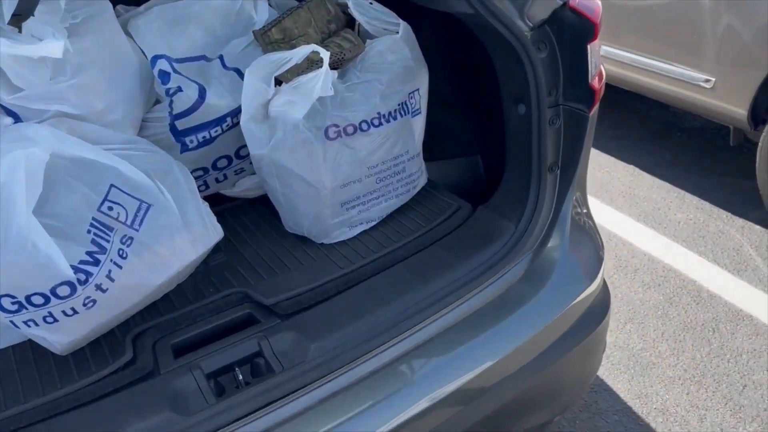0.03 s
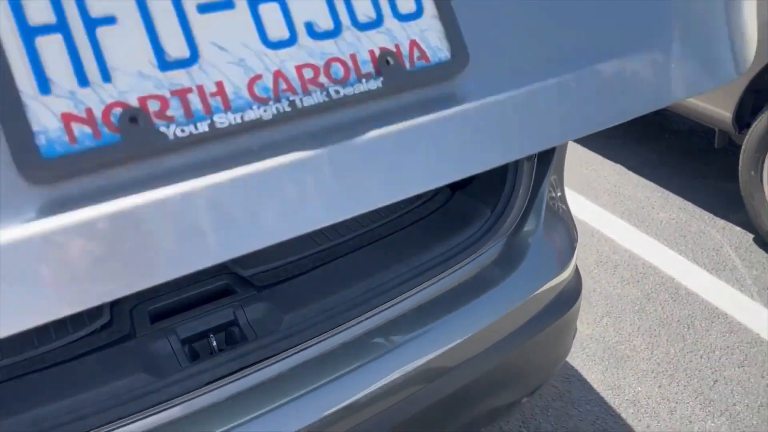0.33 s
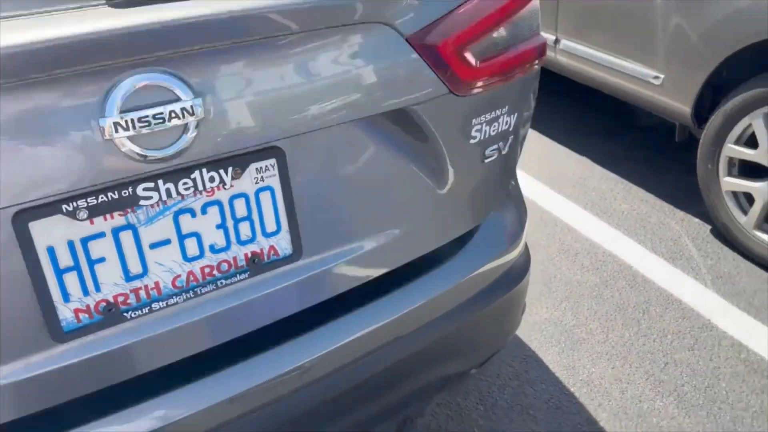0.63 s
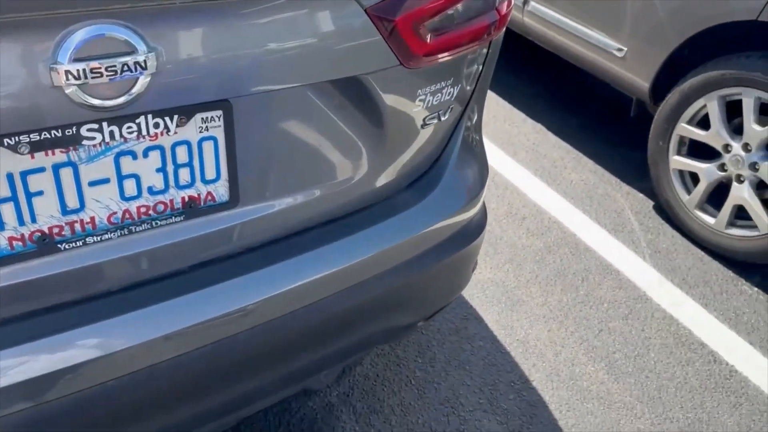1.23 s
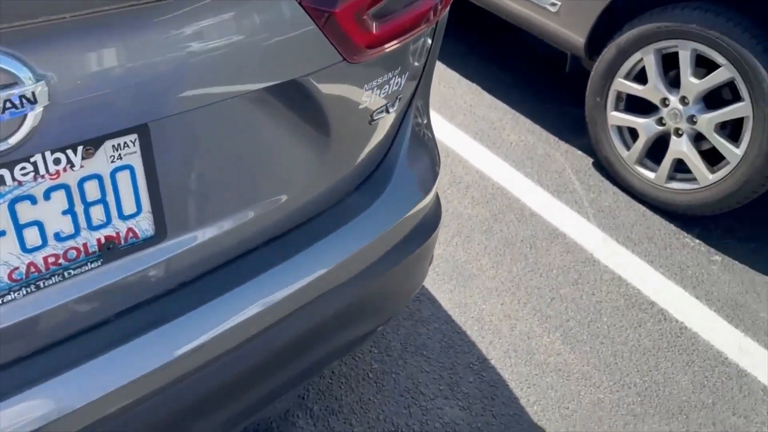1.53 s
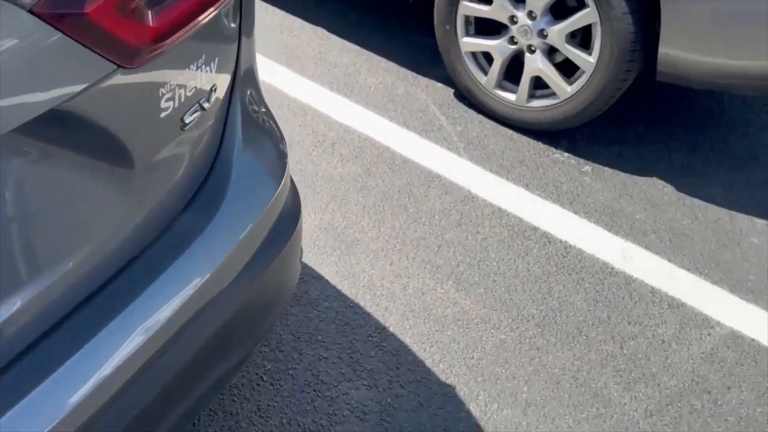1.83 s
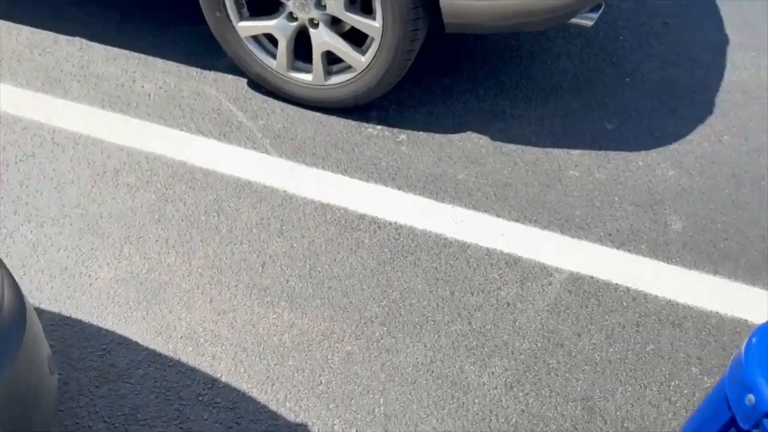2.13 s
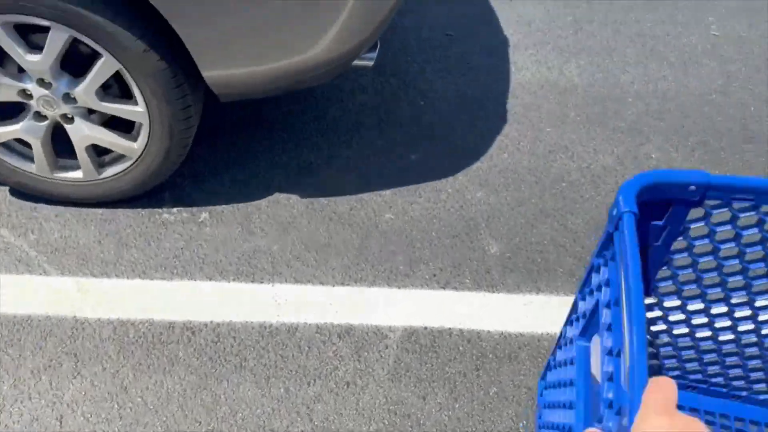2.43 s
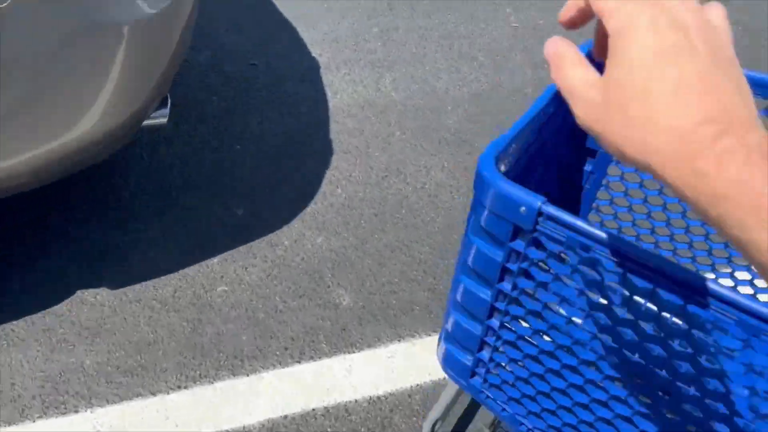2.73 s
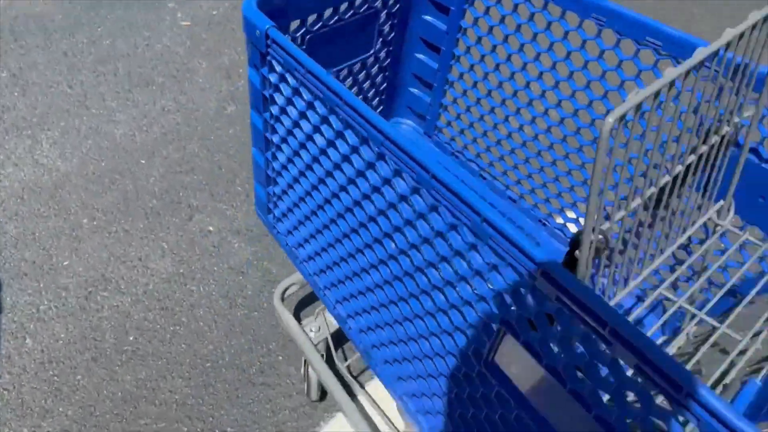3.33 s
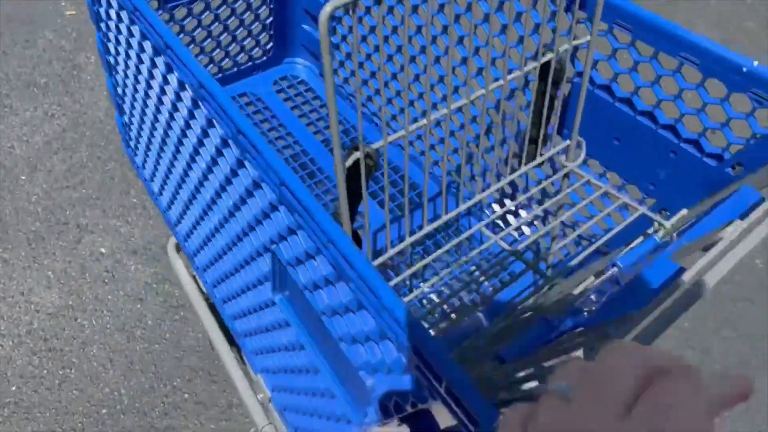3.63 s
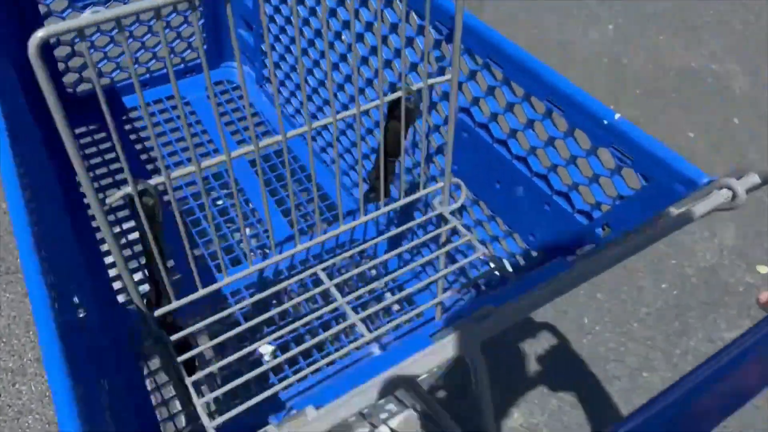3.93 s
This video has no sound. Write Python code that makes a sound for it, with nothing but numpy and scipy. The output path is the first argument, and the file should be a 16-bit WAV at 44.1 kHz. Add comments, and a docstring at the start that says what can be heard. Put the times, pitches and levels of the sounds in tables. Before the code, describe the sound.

A tailgate thumps shut close by, its loose plate clattering, before a shopping cart is pulled across gritty pavement, shaking its plastic basket and wire seat. An engine idles nearby and traffic rumbles far off outdoors.

```python
"""Tailgate and shopping cart in a parking lot

Open air, in stereo, with an engine idling nearby and traffic far off. A car's tailgate is slammed:
the latch catches, the cabin booms and a loose plate clacks against the door until it settles.
Then a plastic shopping cart is pulled over the asphalt: its wheels chatter on the stones
and shake the basket and wire seat."""
import sys
import numpy as np
from scipy import signal
from scipy.fft import rfft, irfft
from scipy.io import wavfile
from scipy.ndimage import uniform_filter1d

SR = 44100
rng = np.random.default_rng(int(sys.argv[2]) if len(sys.argv) > 2 else 0)


def dump(signal):
    """Clip the signal to [-1, 1] and save it as 16-bit WAV at the path in sys.argv[1]."""
    limited = np.clip(np.atleast_2d(signal).T, -1, 1)
    pcm = np.round(limited * 32767).astype(np.int16)
    wavfile.write(sys.argv[1], SR, pcm)


N = 176400

# spectra of the gate meeting its rubber seal, then the car's body: f/Hz, relative level/dB
SEAL_SPECTRUM = [(150, -20), (450, -24), (700, -1), (1200, -1), (4000, -17), (15000, -66)]
SLAM_SPECTRUM = [(25, 0), (60, 10), (140, -3), (240, 1.5), (400, -5.5), (800, -8.5), (1300, -18),
                 (2200, -25.5), (3500, -55), (7000, -34), (15000, -48)]
# modes of the door panel: f/Hz, level/dB, t60/s
PANEL_MODES = [(302, -23, 0.34), (321, -20.5, 1), (501, -27, 1), (1041, -34, 0.66)]
# thuds of the seal, striker, door and air trapped in the cabin: t/s, f/Hz, level/dB, t60/s
THUDS = [(0.7795, 666, -12, .05), (0.7888, 766, -10.5, 0.025), (0.792, 230, -2, 0.042),
         (0.8113, 59.3, -1.5, 0.14)]

def tailgate(seal_s=0.780, slam_s=0.789):
    """The gate touches its seal and is stopped by the body: the panel rings and the cabin booms."""
    click = signal.unit_impulse(SR)
    seal = from_db(-22.5) * burst(SEAL_SPECTRUM, t60=0.12, attack_s=0.0076, hold_s=0.01)
    panel = sum(from_db(db) * ring(click, hz, t60) for hz, db, t60 in PANEL_MODES)
    slam = from_db(-12.5) * burst(SLAM_SPECTRUM, t60=0.76)
    thuds = sum(placed(s, from_db(db) * ring(-click, hz, t60)) for s, hz, db, t60 in THUDS)
    return placed(seal_s, seal) + placed(slam_s, slam) + placed(slam_s, panel) + thuds


# clacks of the hinge, latch and loose plate: t/s, snap level/dB, body level/dB
CLACKS = [(0.495, -48, -32), (0.7872, -19, -16.5), (0.8314, -23, -19), (0.8598, -15, -11),
          (0.8918, -25.5, -22), (0.921, -13, -14), (0.9833, -15.5, -17.5), (1.0452, -22, -22.5),
          (1.109, -27, -23), (1.179, -35, -32.5), (1.2589, -46, -38), (1.678, -50, -50)]
# spectra of the snap, its tail and the plate's body: f/Hz, relative level/dB
SNAP_SPECTRUM = [(500, -8), (1800, -5.5), (2800, -3), (4500, 2), (7000, 2.5), (8800, 9.5), (10500, -1),
                 (15000, -15.5)]
TAIL_SPECTRUM = [(2500, 2), (5000, -0.5), (9000, -21), (15000, -21)]
PLATE_SPECTRUM = [(150, -17), (450, 1.5), (700, -3), (1080, 1.5), (1600, -15), (3000, -21), (8000, -37),
                  (15000, -65)]
# metallic modes of the plate: f/Hz, level/dB relative to the snap, t60/s
PLATE_MODES = [(4300, -12, 0.055), (4680, -18, 0.076), (5400, -17, 0.064), (5980, -7, 0.029),
               (7050, -30, .035)]

def clacks(attack_s=0.0009, detune=0.04):
    """Each bounce is a bright snap with a short metallic ring, over the duller body of the plate."""
    out, click = 0, signal.unit_impulse(SR)
    for s, snap_db, body_db in CLACKS:
        snap = burst(SNAP_SPECTRUM, t60=0.024, attack_s=attack_s, hold_s=0.0041)
        snap += from_db(-8) * burst(TAIL_SPECTRUM, t60=0.079)
        metal = 0
        for hz, db, t60 in PLATE_MODES:  # each bounce lands differently
            strength = from_db(db + rng.normal(0, 3.5)) * rng.choice([-1, 1])
            metal += strength * ring(click, hz * rng.normal(1, detune), t60)
        body = burst(PLATE_SPECTRUM, t60=0.14, attack_s=0.003)
        out += placed(s, from_db(snap_db) * snap + from_db(body_db) * body)
        out += placed(s + attack_s, from_db(snap_db) * metal)
    return out


# how hard the wheels shake the cart: t/s, clatter level/dB, grit level/dB
ROLL_LEVELS = [(2.05, -71, -51.5), (2.13, -37, -61), (2.22, -42.5, -42), (2.28, -29, -26),
               (2.40, -27, -24.5), (2.53, -22, -17.5), (2.64, -24, -22.5), (2.8, -24.5, -20.5),
               (3.05, -27, -25), (3.14, -24.5, -20), (3.26, -33, -32), (3.37, -31.5, -33.5),
               (3.47, -24.5, -19.5), (3.52, -28, -31), (3.58, -28, -26), (3.71, -29, -22.5),
               (3.76, -33, -35.5), (3.83, -32, -23.5), (3.88, -36, -34), (4.0, -33.5, -31.5)]
# spectra of the plastic basket and the grit under the wheels: f/Hz, relative level/dB
BASKET_SPECTRUM = [(100, -8), (220, -4), (420, -0.5), (660, 2), (1050, 0.5), (1450, -1.5), (1850, 2.5),
                   (2150, -4.5), (2750, -3.5), (3300, -9), (6000, -16.5), (15000, -34)]
GRIT_SPECTRUM = [(1000, -15.5), (3200, 2.5), (5000, 1), (6000, 0), (7200, 1.5), (8500, -7), (10500, -2),
                 (13000, -4), (15500, -7)]
# modes of the wire seat and steel frame, then of the thin wires: f/Hz, relative level/dB, t60/s
SEAT_MODES = [(578, -15.5, 0.11), (680.4, -14.5, 0.11), (943.3, -17, 0.22), (1420, -18, 0.065),
              (1758, -11.5, 0.14), (1818, -11, 0.023), (2250, -21, 0.12), (2460, -34, 0.076),
              (2660, -23.5, .09), (2780, -25, 0.21)]
THIN_WIRE_MODES = [(3940, -24, 0.034), (4650, -21, 0.16), (5270, -21, 0.047), (6690, -25.5, 0.1)]

def rolling_cart(axles=2):
    """Front and rear wheels knock and crunch over the stones, shaking the basket and the wires."""
    clatter_gain, grit_gain = from_db(in_time(ROLL_LEVELS))
    knocks = [contacts(per_s=220, spread_db=1) for _ in range(axles)]
    grains = [contacts(per_s=600, spread_db=3) + from_db(-5.5) * k for k in knocks]
    basket = rms_one(sum(axle(k, BASKET_SPECTRUM, t60=0.063) for k in knocks))
    grit = rms_one(sum(axle(g, GRIT_SPECTRUM, t60=0.03) for g in grains))
    clatter = from_db(-3) * basket + from_db(-5.5) * ribs(sum(knocks)) + wires(sum(knocks), SEAT_MODES)
    crunch = from_db(-6.5) * grit + wires(sum(grains), THIN_WIRE_MODES)
    return clatter_gain * clatter + grit_gain * crunch


def contacts(per_s, spread_db):
    """Wheels meet stones: random, uneven clicks whose power stays even over tenths of a second."""
    sizes = from_db(spread_db * np.minimum(rng.exponential(1, N), 4)) * rng.choice([-1, 1], N)
    clicks = sizes * (rng.random(N) < per_s / SR)
    local_power = uniform_filter1d(clicks ** 2, size=5000)
    return clicks / np.sqrt(local_power + 0.13 * per_s / SR)


def axle(clicks, spectrum, t60):
    """One axle's contacts sounding through the cart, rms 1."""
    response = burst(spectrum, t60, attack_s=0.0013)
    return rms_one(signal.fftconvolve(clicks[None], response, axes=1)[:, :N])


def ribs(shaking, count=48, low_hz=602, high_hz=4801):
    """Each knock sets one rib of the plastic lattice ringing briefly at its own pitch, rms 1."""
    out, struck_rib = 0, rng.integers(0, count, N)
    pitches = np.linspace(low_hz, high_hz, count) * rng.uniform(1.0, 1.03, count)
    for rib, hz in enumerate(pitches):
        pan = rms_one(from_db(rng.normal(0, 1.5) * np.array([[-1], [1]])))
        out += pan * gain_at(BASKET_SPECTRUM, hz) * ring(shaking * (struck_rib == rib), hz, t60=0.059)
    return rms_one(out)


def wires(shaking, modes, side_db=-24.5, wander=0.012):
    """Every contact strikes every wire with its own strength; pitches wander as the loose seat shifts."""
    out, samples = 0, np.arange(N)
    for hz, db, t60 in modes:
        mid, side = rms_one(ring(shaking * rng.standard_normal((2, N)), hz, t60))
        out += from_db(db) * left_right(mid, from_db(side_db) * side)
    warped = samples + np.cumsum(wander * drift(rate_hz=12.18))
    return np.array([np.interp(warped % N, samples, channel) for channel in out])


# bigger stones in the asphalt: t/s, basket level/dB, crack level/dB
JOLTS = [(2.193, -39, -31.5), (2.231, -20.5, -35), (2.277, -27, -22), (2.362, -40, -30), (2.437, -17, -28),
         (2.496, -22, -16), (2.522, -19, -29), (2.567, -16.5, -18), (2.679, -18, -16.5), (2.778, -20, -28),
         (2.820, -18, -19), (2.889, -19, -20.5), (3.114, -35, -29), (3.127, -24, -21), (3.381, -47, -27),
         (3.411, -32, -27), (3.473, -20.5, -40), (3.551, -19, -39), (3.564, -31, -19), (3.643, -19.5, -20),
         (3.705, -21, -25.5), (3.7775, -42, -23), (3.7875, -21.5, -33), (3.7923, -19.5, -15),
         (3.802, -35, -20)]
# spectrum of the gritty crack: f/Hz, relative level/dB
CRACK_SPECTRUM = [(1000, -27), (3200, -18.5), (5000, 5), (7000, 7), (10000, 14), (15500, -8.5)]

def jolts(attack_s=0.00035):
    """A wheel hits a bigger stone with a crack and jolts the basket."""
    out = 0
    for s, basket_db, crack_db in JOLTS:
        basket = from_db(basket_db) * burst(BASKET_SPECTRUM, t60=0.07, attack_s=attack_s, hold_s=0.00081)
        crack = from_db(crack_db) * burst(CRACK_SPECTRUM, t60=0.06, attack_s=attack_s)
        out += placed(s, basket + crack)
    return out


# bumps of the cart: t/s, level/dB
BUMPS = [(3.041, -18), (3.143, -32), (3.222, -15.5), (3.28, -37)]
# their spectrum: f/Hz, relative level/dB
BUMP_SPECTRUM = [(25, -10), (60, 11), (110, 0.5), (190, 1.5), (350, -37), (2000, -43)]

def bumps():
    """The cart bumps dully as it is swung round."""
    return sum(placed(s, from_db(db) * burst(BUMP_SPECTRUM, t60=0.4, attack_s=0.0027, hold_s=0.012))
               for s, db in BUMPS)


# firing rate of the engine nearby: t/s, f/Hz
FIRING_RATE = [(0, 21.2), (0.8, 21.1), (1.6, 19.55), (2.6, 19.7), (3.3, 19.0), (4, 16.7)]
# its loudness at the microphone: t/s, level/dB
ENGINE_LEVEL = [(0, -32), (0.6, -24.5), (1.05, -23), (1.5, -17), (2.0, -26), (2.45, -19), (2.8, -23.5),
                (3.1, -18.5), (3.35, -23.5), (4, -25.5)]
# exhaust tones: multiple of the firing rate, relative level/dB
EXHAUST_ORDERS = [(2, -27), (3, -8.5), (4, -5), (5, -3.5), (6, -32), (7, -13), (10, -25)]

def engine(jitter=0.0052, waver_db=2.3, slip_turns=0.1, pan_db=1.3):
    """Just right of centre, low exhaust tones waver in level and timing on a sinking firing rate."""
    (firing_hz,), (level_db,) = in_time(FIRING_RATE), in_time(ENGINE_LEVEL)
    turns = np.cumsum(firing_hz * (1 + jitter * drift(rate_hz=6.7))) / SR
    tones = 0
    for order, db in EXHAUST_ORDERS:
        gain = from_db(db + waver_db * drift(rate_hz=12))
        phase = order * turns + rng.random() + slip_turns * drift(rate_hz=15)
        tones += gain * np.sin(2 * np.pi * phase)
    return np.sqrt(2) * tones * from_db(level_db) * from_db([[-pan_db], [pan_db]])


# swishes as the gate swings down and before the cart moves: t/s, half length/s, centre f/Hz, level/dB
SWISHES = [(0.68, .12, 5670, -55), (1.97, 0.076, 5020, -54.5)]

def swishes(skirt_ratio=1.3, skirt_db=-19.5):
    """Faint, narrow bands of high hiss swell and fade."""
    out, t = 0, np.arange(N) / SR
    for s, half_s, hz, db in SWISHES:
        band = [(hz * skirt_ratio ** k, skirt_db * abs(k)) for k in (-2, 0, 2)]
        swell = np.exp(-0.5 * ((t - s) / half_s) ** 2)
        out += noise(band, size=N) * from_db(db) * swell
    return out


# spectra of distant traffic, its rumble and its tyres: f/Hz, relative level/dB
RUMBLE_SPECTRUM = [(24, -23), (42, -4), (110, -1.5), (170, -9), (260, -14.5), (430, -18), (950, -20.5),
                   (1300, -32), (2300, -43), (4000, -50.5), (6500, -79), (15000, -76)]
TYRE_SPECTRUM = [(200, -10.5), (500, 1), (900, 1), (1300, -4), (2300, -8.5), (4000, -31), (7000, -41),
                 (15000, -58)]
# tyre noise at the microphone: t/s, level/dB
TYRE_LEVEL = [(0, -47.5), (0.7, -41), (1.4, -50.5), (2.0, -47.5), (4, -60)]

def traffic():
    """Far from the lot, traffic rumbles steadily under a fading wash of tyres."""
    rumble = from_db(-28) * noise(RUMBLE_SPECTRUM, size=N)
    tyres = from_db(in_time(TYRE_LEVEL)[0]) * noise(TYRE_SPECTRUM, size=N)
    return rumble + tyres


# stereo width at the microphone: f/Hz, level/dB of side over mid
STEREO_WIDTH = [(60, -4.5), (200, -8.5), (400, -5.5), (750, -1), (1250, 1), (2200, -7.5), (3500, -2.5),
                (6300, -2.5), (7400, 4), (8300, 33.5), (9400, 21.5), (11000, 10.5), (13000, -3.5),
                (15000, -4.5)]

def noise(spectrum, size):
    """Stereo noise of a given colour, rms 1."""
    hz = np.fft.rfftfreq(size, 1 / SR)
    width = gain_at(STEREO_WIDTH, hz)
    phases = np.exp(2j * np.pi * rng.random((2, len(hz))))
    mid, side = phases * gain_at(spectrum, hz) / np.hypot(1, width)
    return rms_one(irfft(left_right(mid, side * width), size))


def burst(spectrum, t60, attack_s=0.00065, hold_s=0):
    """A struck body with many close modes: attack, hold, decay."""
    t = np.arange(SR // 2) / SR
    attack = np.minimum(t / attack_s, 1)
    decay = from_db(-60 * np.maximum(t - attack_s - hold_s, 0) / t60)
    return noise(spectrum, size=len(t)) * attack * decay


def ring(x, hz, t60):
    """One mode: a unit click rings as a decaying sine of height 1."""
    radius, angle = from_db(-60 / (t60 * SR)), 2 * np.pi * hz / SR
    return signal.lfilter([0, np.sin(angle)], [1, -2 * radius * np.cos(angle), radius ** 2], x + 1e-18)


def drift(rate_hz):
    """A slow random wander with spread 1."""
    size = N // 40
    hz = np.fft.rfftfreq(size, N / size / SR)
    spectrum = rfft(rng.standard_normal(size)) / (1 + (hz / rate_hz) ** 2) ** 2
    return np.interp(np.arange(N), np.linspace(0, N, size), rms_one(irfft(spectrum, size)))


def placed(s, sound):
    """A sound starting s seconds into the stereo track."""
    out, start = np.zeros((2, N)), int(s * SR)
    part = sound[..., :N - start]
    out[:, start:start + part.shape[-1]] = part
    return out


def in_time(rows):
    """The columns of a curve at every sample."""
    s, *columns = np.transpose(rows)
    return [np.interp(np.arange(N) / SR, s, column) for column in columns]


def gain_at(points, hz):
    """Gain of a dB table on a log-frequency axis."""
    table_hz, db = np.transpose(points)
    return from_db(np.interp(np.log(hz + 1), np.log(table_hz), db))


def left_right(mid, side):
    """Mid and side to two channels."""
    return np.array([mid + side, mid - side])


def from_db(db):
    """Decibels to gain."""
    return 10 ** (np.asarray(db) / 20)


def rms_one(x):
    """Scale to rms 1."""
    return x / np.sqrt(np.mean(x ** 2) + 1e-20)


def scene():
    """The lot as it reaches the microphone: open air, with no room."""
    background = engine() + traffic() + swishes()
    return background + tailgate() + clacks() + rolling_cart() + jolts() + bumps()


def record(dry):
    """The highest peaks are rounded and the top is cut above 16 kHz."""
    rounded = dry / (1 + dry ** 6) ** (1 / 6)
    lowpass = signal.ellip(10, 0.1, 90, 16000, fs=SR, output="sos")
    return signal.sosfilt(lowpass, rounded)


dry = scene()
out = record(dry)
dump(out)
```